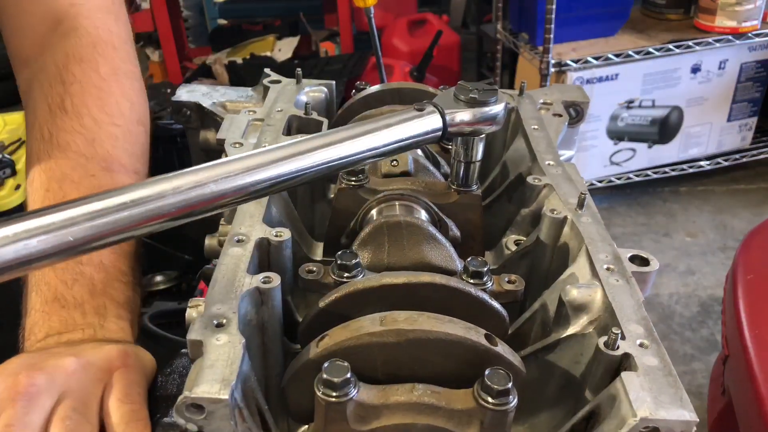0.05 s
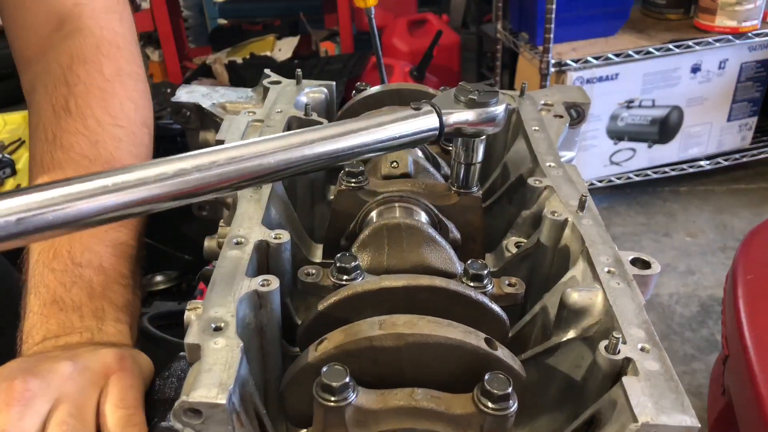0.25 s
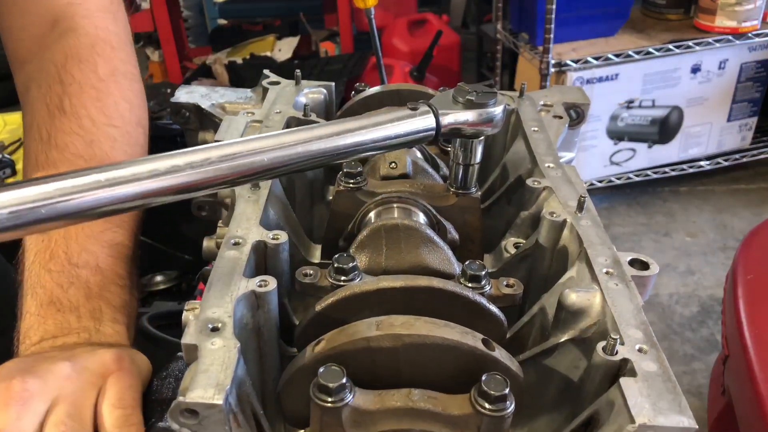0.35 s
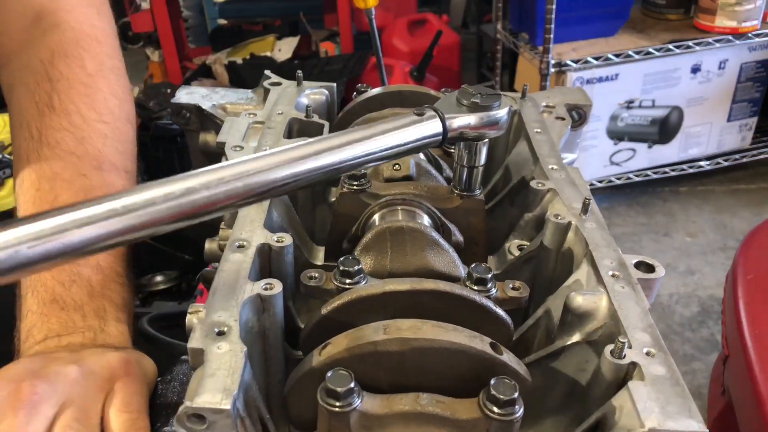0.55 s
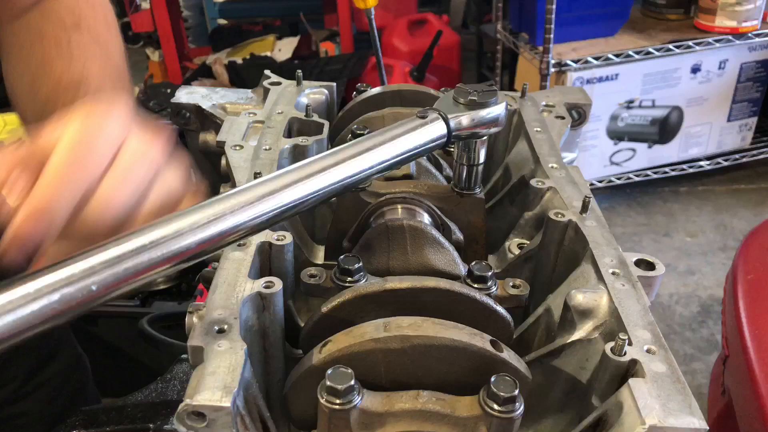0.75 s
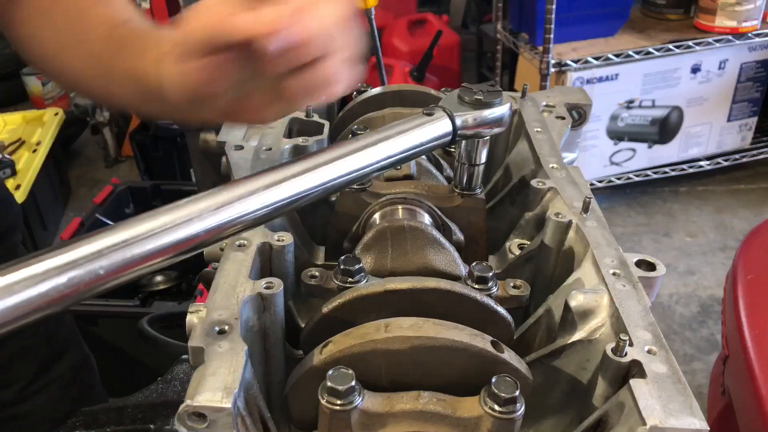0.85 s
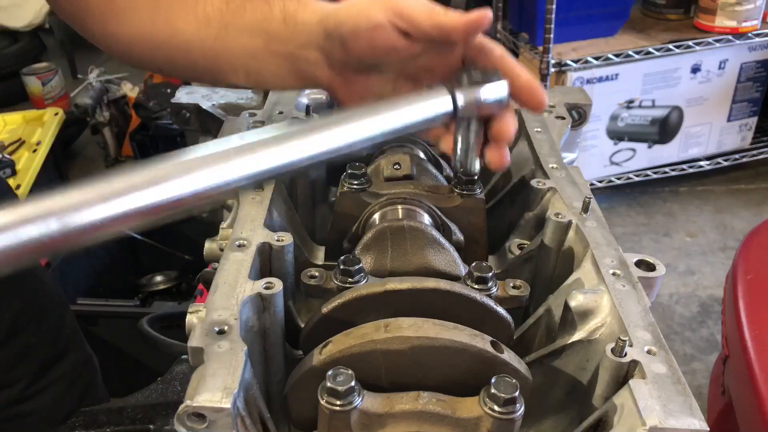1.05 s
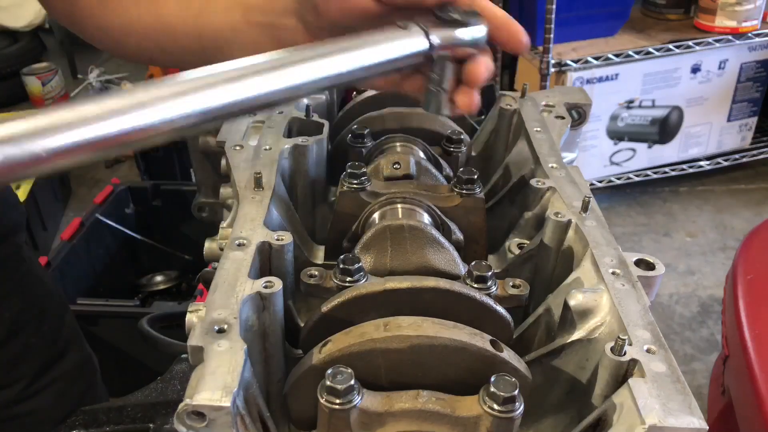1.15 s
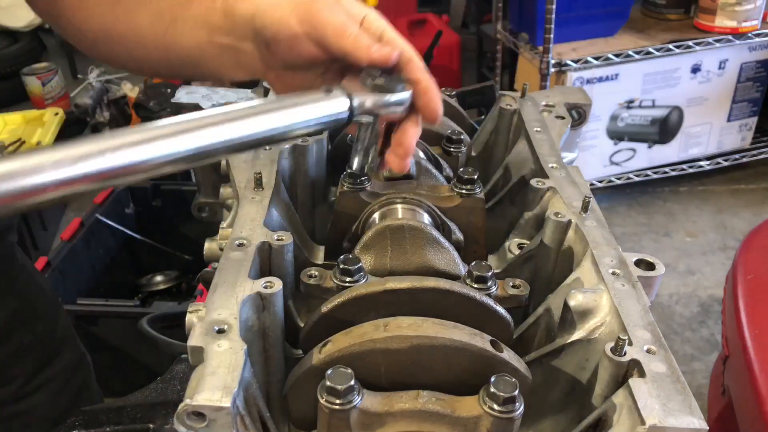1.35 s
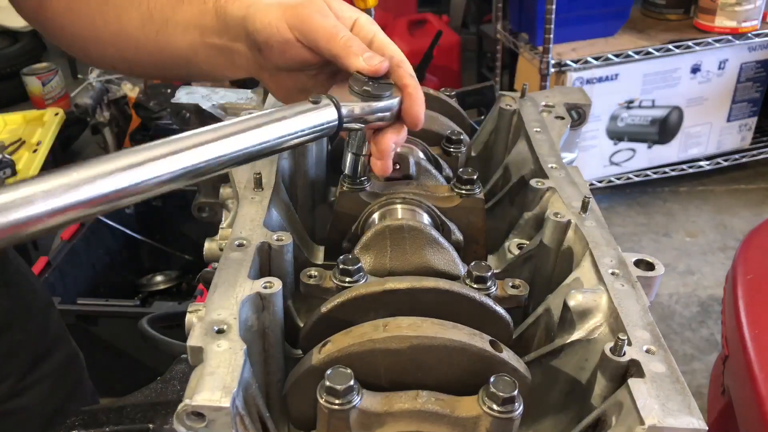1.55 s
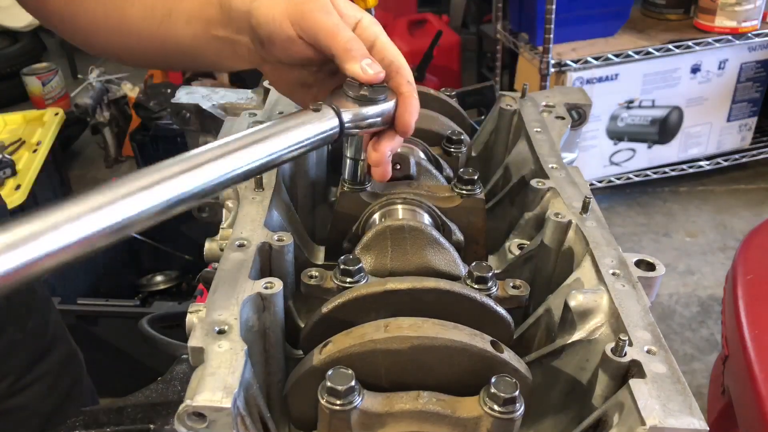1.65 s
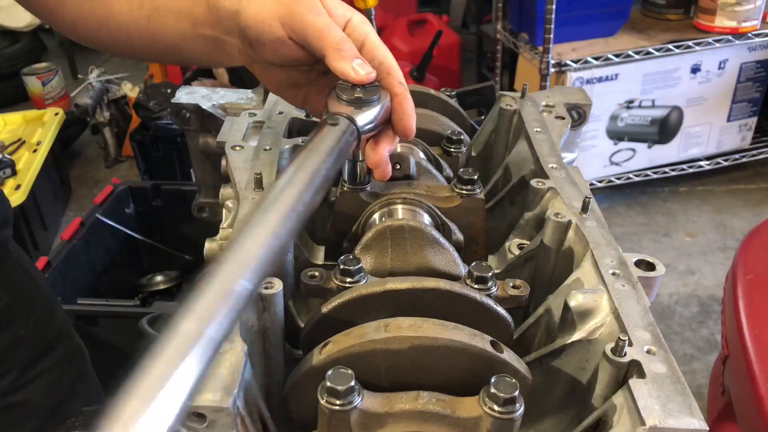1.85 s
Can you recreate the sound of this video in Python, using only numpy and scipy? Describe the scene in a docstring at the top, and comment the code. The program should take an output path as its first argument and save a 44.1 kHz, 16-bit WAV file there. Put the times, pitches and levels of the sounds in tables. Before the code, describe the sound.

Close to a bare engine block, a torque wrench cracks over and snaps back, steel ringing faintly; after a short gap come lighter metal clacks and rattles of the socket seating, in a quiet, echoing workshop.

```python
"""In a workshop, close to a bare engine block, a click-type torque wrench works on the bolts.
The wrench breaks over with a sharp click and snaps back with a rebound; then the socket rattles onto the next bolt.
These contacts are short noise bursts filtered by the steel; the block shudders in dull, filtered noise.
Decaying sines are the faint ring of the steel, and fading noise bands are the echoes of the room.
Steady coloured noise and a low resonant hum lie underneath at the microphone."""
import sys
import numpy as np
from scipy import signal
from scipy.fft import rfft, irfft, next_fast_len
from scipy.io import wavfile

SR = 44100
rng = np.random.default_rng(int(sys.argv[2]) if len(sys.argv) > 2 else 0)


def to_wav(sig):
    """Store sig (one row per channel, or 1-D mono) as 16-bit WAV at the path in sys.argv[1].

    Samples outside -1..1 are clipped; the rate is SR.
    """
    pcm = np.clip(np.atleast_2d(sig), -1, 1) * 32767
    pcm = np.round(pcm).astype(np.int16)
    wavfile.write(sys.argv[1], SR, pcm.T)  # frames by channels


N = 83790   # length in samples

# The break-over, the snap back and its rebound. Each row: start in seconds, energy in dB, decay constant
# in ms, bass, low mids and treble in dB, clank pitch in Hz, clank lift in dB, send to the room in dB.
WRENCH_CLICKS = [(0.224, 6.5, 1.53, -6.5, -6, 0.5, 13800, 2, -1.5),
                 (0.5827, 7.5, 1.08, -3.5, -1, -4, 4200, 2, -13.5),
                 (0.5844, 3, 3.3, -5, -2.5, -0.5, 1680, 8, -16)]
# Colour of the wrench tube. Each row: frequency in Hz, relative spectral density in dB.
WRENCH_COLOUR = [(100, -16.5), (300, -9), (650, -10), (1300, -9), (2100, -1), (3000, -2), (4600, -0.5),
                 (6600, -2), (10000, -4), (11800, -9.5), (15500, -10.5)]
# Resonances of wrench tube and head. Each row: centre in Hz, width in Hz, lift in dB.
WRENCH_PEAKS = [(964, 180, 14), (1825, 150, 0.5), (2550, 230, 4.5), (2990, 200, 3), (3406, 290, 3.5),
                (4410, 150, 2), (5290, 540, 6.5), (7960, 390, 12), (9970, 690, 9), (12970, 650, 9.5)]

# Ratchet ticks, hand bumps and socket knocks. Each row: start in seconds, energy in dB, decay constant
# in ms, bass, low mids and treble in dB, clank pitch in Hz, clank lift in dB.
CONTACTS = [ (0.2018, -27, 3, -7, 8.5, 15, 9850, 11), (0.212, -27, 4.5, -12, 9, -3.5, 13000, 12),
            (0.56, -41.5, 1, -4, 4, -1, 4400, 11), (.7640, -25, 7.1, 26, 12, -4, 177, 8),
            (.8670, -37.5, 4.7, -4, -3, 5, 4400, 6), (.9020, -27.5, 9.7, 5, 13, -19, 2764, 8),
            (1.0114, -22.5, 0.29, -4.5, -3, -8, 3080, 10.5), (1.0640, -29, 3, 25.5, 12, 12.5, 334, 17.5),
            (1.0803, -34.5, 1.8, -7, -5, 16, 8300, 20), (1.0920, -32.5, 26, -12, 10, -13, 2000, 2.5),
            (1.1070, -20.5, 22, -7, 9.5, -19, 2300, 5), (1.1220, -30.5, 3.3, -10, -2, -9, 6000, 8),
            (1.1329, -6, 7.7, -17, -3, -3.5, 1640, 6.5), (1.1358, 0.5, 2.6, -18, 0.5, 8, 8400, 10),
            (1.1397, -1.5, 3, -24, -9, 7.5, 9600, 12.5), (1.4548, -11.5, 1.1, -16, 6, -4, 6800, 15),
            (1.4569, -3, 1.5, -9, -4.5, 2, 5060, 3), (1.4596, -5, 4.6, -1, 0, -11.5, 1062, 13),
            (1.5035, -20, 2.8, -5, -2, -13, 3500, 11), (1.5298, -24.5, 3.3, 13, 9, -7.5, 1820, 5),
            (1.5335, -14.5, 2.9, 14.5, 8.5, -9.5, 13900, 13), (1.6732, -26.5, 3.6, 3, 7, -7, 4200, 4.5),
            (1.701, -22, 20, 9, 8, -9.5, 1500, 4.5), (1.7145, -10.5, 3.5, 8.5, 2, 0, 1780, 8),
            (1.7242, -17.5, 3, 6, 8, 2.5, 3130, -5), (1.888, -27, 7, -1, 8.5, -7, 2196, 13)]
# Colour shared by all contacts of socket and bolt. Each row: frequency in Hz, relative density in dB.
STEEL_COLOUR = [(60, -23.5), (200, -6.5), (330, -3), (620, -15.5), (1000, -5.5), (2200, -1), (4500, 0),
                (7000, -1), (9000, -6), (12000, -13.5), (14000, -11.5), (16000, -22), (20000, -40.5)]
# Resonances of the socket. Each row: centre in Hz, width in Hz, lift in dB.
SOCKET_PEAKS = [(1062, 120, 1), (1860, 130, 2.5), (2250, 200, 3), (3230, 490, 4.5), (4350, 310, 0),
                (5050, 150, 0.5), (8130, 300, 0.5), (9300, 310, -0.5), (13280, 600, 5.5)]
SOCKET_ROOM_DB = -15   # send to the room, against the direct sound

# Tone controls of a contact. Each entry: frequency in Hz of bass, low mids, middle, treble.
TONE_HZ = [250, 1200, 3800, 11000]
CRACK_SHARE = 0.56   # first sample of an impact, against a chatter of energy one
CHATTER_DB, CHATTER_MS = 3.5, 1.2   # spread of the level wander, spacing of its turning points
CLANK_WIDTH_SHARE = 0.22   # width of a clank against its pitch

# Shudders of block and stand, after the clicks and as the socket is seated.
# Each row: start in seconds, energy in dB.
JOLTS = [(.235, -13), (0.587, -16.5), (1.772, -28.5)]
# Colour of the shudder. Each row: frequency in Hz, relative spectral density in dB.
JOLT_COLOUR = [(30, -20), (55, 0), (100, -11.5), (210, 0), (260, -2.5), (345, 7.5), (440, -14.5),
               (900, -23), (4000, -57)]
JOLT_DECAY_MS = 47   # decay constant, before the colouring

# Pitches of the steel ringing on after the break-over. Each entry: frequency in Hz.
RING_HZ = [333, 366, 983, 6765, 7903, 10750]
# Strength of those pitches, in the same order. Each row: starting amplitude in dB, t60 in seconds.
RING_DECAYS = [(-54.5, 0.38), (-49.5, 0.64), (-47.5, 0.35), (-51, 1.6), (-49, .35), (-57, 1.6)]

# Echo decay of the workshop. Each row: frequency in Hz, t60 in seconds.
ROOM_T60 = [(150, 0.01), (700, 0.5035), (2500, 0.48), (5000, 0.47), (9000, 0.29), (13000, 0.26),
            (16000, 0.24)]
# Broad colour of the workshop. Each row: frequency in Hz, gain in dB.
ROOM_COLOUR = [(100, 8), (300, 6.5), (1000, 3), (3000, 2.5), (5300, -2.5), (8000, -2), (15000, 0)]
# Resonances of the workshop. Each row: centre in Hz, width in Hz, lift in dB.
ROOM_PEAKS = [(340, 22, 12), (373.6, 23, 8.5), (712, 56, 5)]
ROOM_DELAY_S, NEAR_ECHO_SHARE = 0.011, 0.65   # echoes before this delay are held to this share
EARLY_LIFT, EARLY_S = 0.28, 0.035   # extra strength of the early wall echoes, its decay constant

# Colour of the steady room noise. Each row: frequency in Hz, relative spectral density in dB.
AIR_COLOUR = [(20, -30.5), (35, -18), (55, -1.5), (75, -12.5), (110, -8), (200, -11), (330, -9),
              (500, -12.5), (1000, -18), (2000, -25.5), (4000, -26), (7000, -33.5), (15000, -35.5),
              (16000, -43.5)]
AIR_DB = -64.5   # RMS level
HUM_HZ, HUM_WIDTH_HZ, HUM_DB = 67, 11, -69   # pitch, width of each of two resonators, RMS level

PEAK_TOP, CUTOFF_HZ = 1.1, 16200   # ceiling of the peak rounding, upper edge of the band


def from_db(db):
    """Decibels to gain."""
    return 10 ** (np.asarray(db) / 20)


def unit(x):
    """Scale to an energy of one."""
    return x / np.sqrt(np.sum(x ** 2) + 1e-20)


def at_hz(points, hz):
    """Read a table on a log-frequency axis."""
    f, value = np.transpose(points)
    return np.interp(np.log(np.maximum(hz, 1)), np.log(f), value)


def colour(x, spectrum, peaks=(), tone=(0, 0, 0, 0)):
    """Minimum-phase filter made of a broad spectrum, resonances and four tone controls."""
    size = 2 * next_fast_len(len(x))
    hz = np.arange(size // 2 + 1) * SR / size
    db = at_hz(spectrum, hz) + at_hz(list(zip(TONE_HZ, tone)), hz)
    for centre, width, lift in peaks:
        db = db + lift / (1 + (2 * (hz - centre) / width) ** 2)
    # folding the cepstrum onto positive times makes the filter causal
    cepstrum = irfft(np.log(from_db(db)))
    cepstrum[1:size // 2] *= 2
    cepstrum[size // 2 + 1:] = 0
    response = np.exp(rfft(cepstrum))
    return irfft(rfft(x, size) * response)[:len(x)]


def add(track, s, sound):
    """Mix a sound in at a time."""
    i = int(s * SR)
    track[i:i + len(sound)] += sound[:len(track) - i]


def impact(decay_ms, size=4096):
    """A crack followed by the uneven, dying chatter of parts in contact."""
    ms = 1000 * np.arange(size) / SR
    wander = np.interp(ms / CHATTER_MS, np.arange(size), rng.standard_normal(size))
    chatter = from_db(CHATTER_DB * wander)
    burst = unit(rng.standard_normal(size) * chatter * np.exp(-ms / decay_ms))
    burst[0] += CRACK_SHARE
    return burst


def strikes(rows, spectrum, peaks):
    """Impacts on one body: the direct sound, and the smoother sound sent all round into the room."""
    direct, sent = np.zeros(N), np.zeros(N)
    for s, db, decay_ms, bass, low_mids, treble, clank_hz, clank_db, room_db in rows:
        burst = impact(decay_ms)
        clank = (clank_hz, clank_hz * CLANK_WIDTH_SHARE, clank_db)
        tone = (bass, low_mids, 0, treble)
        body = colour(signal.unit_impulse(len(burst)), spectrum, [*peaks, clank], tone)
        add(direct, s, from_db(db) * unit(signal.fftconvolve(burst, body)))
        add(sent, s, from_db(db + room_db) * unit(body))   # the body alone, without the chatter
    return np.array([direct, sent])


def wrench():
    """Break-over and snap back: short impacts through the resonances of tube and head."""
    return strikes(WRENCH_CLICKS, WRENCH_COLOUR, WRENCH_PEAKS)


def socket():
    """Knocks, ticks and bumps of ratchet, socket and bolt, each with a clank of its own."""
    rows = [(*row, SOCKET_ROOM_DB) for row in CONTACTS]
    return strikes(rows, STEEL_COLOUR, SOCKET_PEAKS)


def engine_block():
    """A dull shudder of block and stand at each jolt: longer impacts, weighted to the low end."""
    out = np.zeros(N)
    for s, db in JOLTS:
        shudder = colour(impact(JOLT_DECAY_MS, size=16384), JOLT_COLOUR)
        add(out, s, from_db(db) * unit(shudder))
    return out


def ringing():
    """The break-over sets the long modes of the steel going: exponentially decaying sines."""
    out, t = np.zeros(N), np.arange(N) / SR
    break_over_s = WRENCH_CLICKS[0][0]
    for hz, (db, t60) in zip(RING_HZ, RING_DECAYS):
        decay = np.exp(-np.log(1000) * t / t60)
        add(out, break_over_s, from_db(db) * np.sin(2 * np.pi * hz * t) * decay)
    return out


def workshop(x, count=16):
    """Diffuse echoes: a few from the engine itself, then the walls; each band dies at its own rate."""
    t = np.arange(SR) / SR
    noise = rfft(rng.standard_normal(SR))
    hz = np.arange(SR // 2 + 1)
    centres, tail = np.geomspace(100, 16000, count), 0
    for centre, share in zip(centres, np.eye(count)):
        # overlapping triangular bands on the log-frequency axis
        band = irfft(noise * at_hz(list(zip(centres, share)), hz), SR)
        tail = tail + band * np.exp(-np.log(1000) * t / at_hz(ROOM_T60, centre))
    walls = 1 + EARLY_LIFT * np.exp(-t / EARLY_S)
    tail = unit(tail * np.where(t < ROOM_DELAY_S, NEAR_ECHO_SHARE, walls))
    return signal.fftconvolve(x, colour(tail, ROOM_COLOUR, ROOM_PEAKS))[:N]


def background():
    """Steady coloured room noise, and a wavering low hum of noise through two resonators."""
    # the first second is dropped while the filters settle
    air = colour(rng.standard_normal(N + SR), AIR_COLOUR)[SR:]
    b, a = signal.iirpeak(HUM_HZ, HUM_HZ / HUM_WIDTH_HZ, fs=SR)
    hum = signal.lfilter(b, a, rng.standard_normal(N + SR))
    hum = signal.lfilter(b, a, hum)[SR:]
    # sqrt(N) turns an energy of one into an RMS of one
    return np.sqrt(N) * (from_db(AIR_DB) * unit(air) + from_db(HUM_DB) * unit(hum))


def scene():
    """Wrench and socket straight to the microphone, with block, ring, room echoes and background."""
    direct, sent = wrench() + socket()
    return (direct + engine_block() + ringing() + workshop(sent) + background())[None]


def record(dry):
    """The microphone channel: high peaks are rounded, then the top is cut steeply."""
    rounded = PEAK_TOP * np.tanh(dry / PEAK_TOP)
    low_pass = signal.ellip(10, 0.1, 80, CUTOFF_HZ, fs=SR, output="sos")
    return signal.sosfilt(low_pass, rounded)


dry = scene()
out = record(dry)
to_wav(out)
```